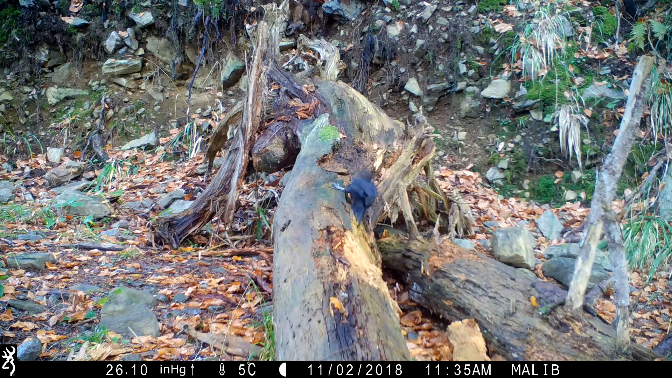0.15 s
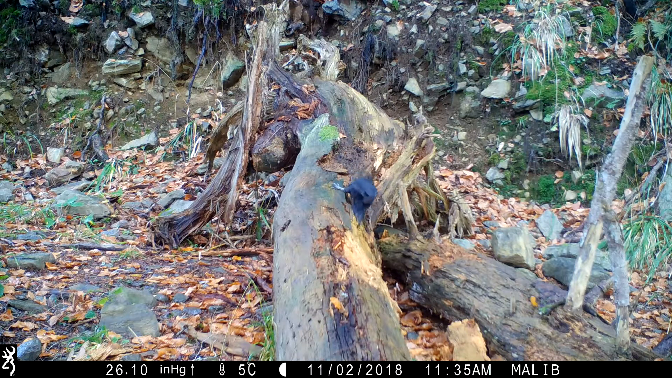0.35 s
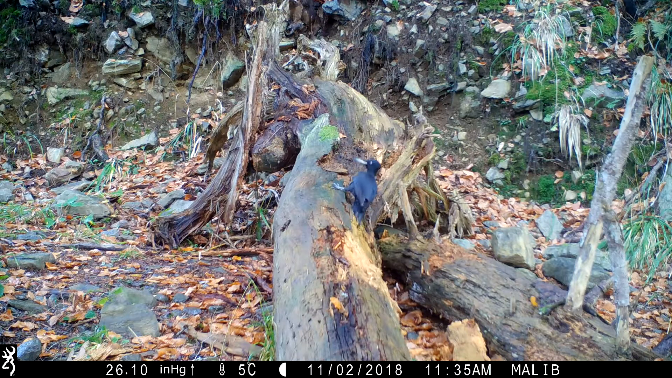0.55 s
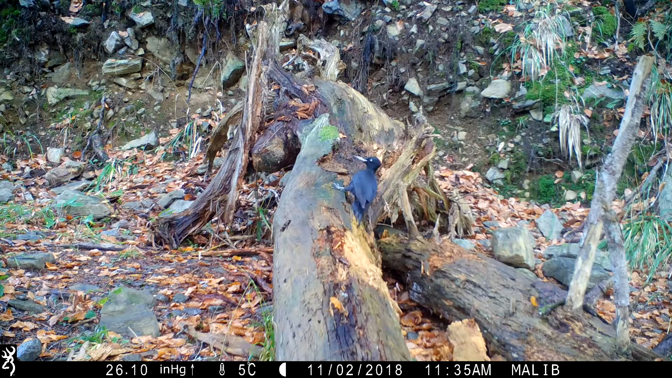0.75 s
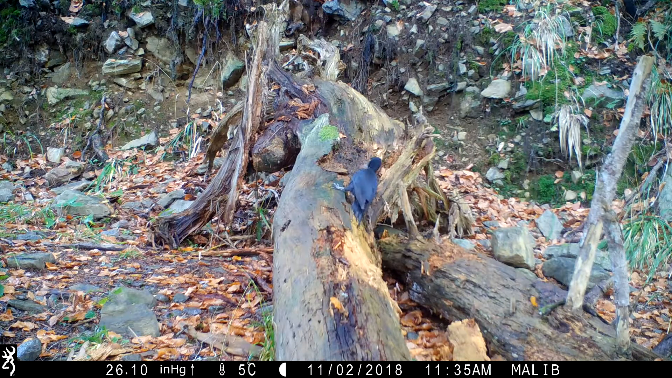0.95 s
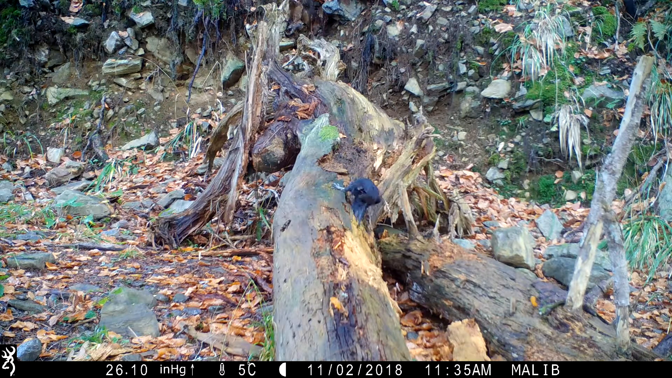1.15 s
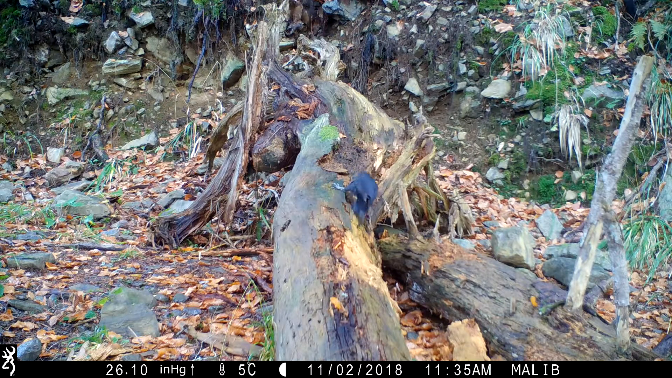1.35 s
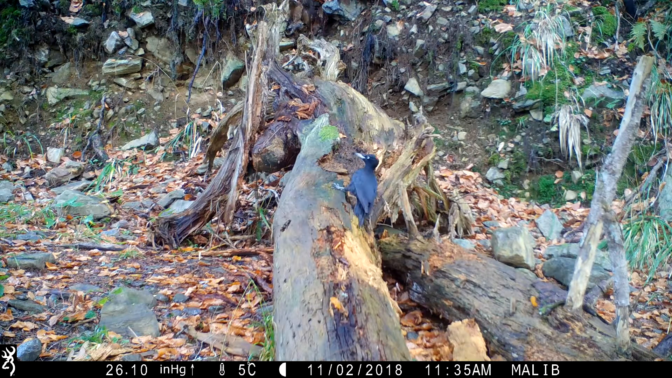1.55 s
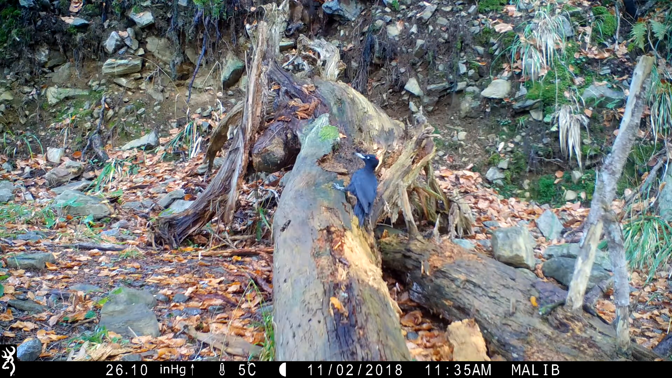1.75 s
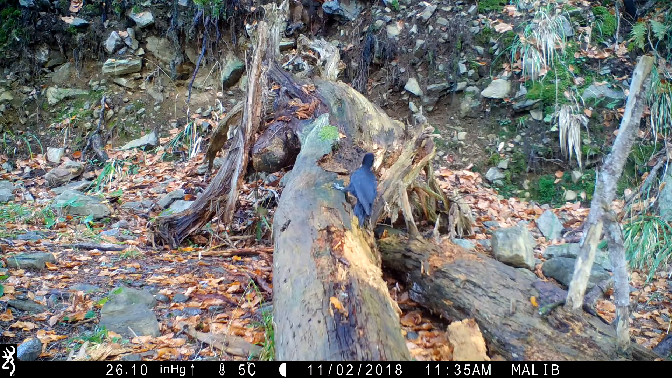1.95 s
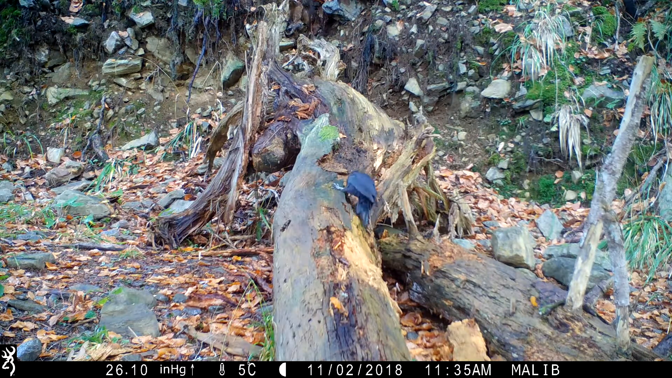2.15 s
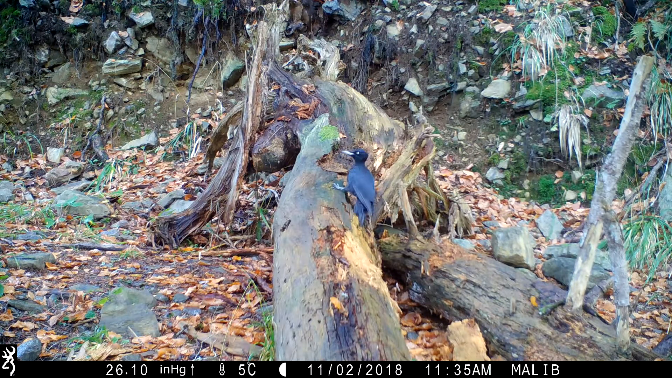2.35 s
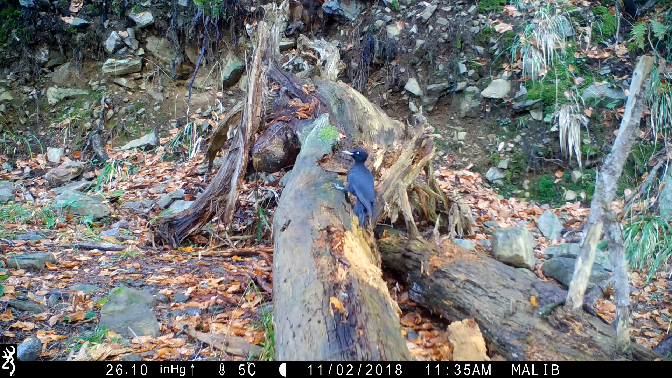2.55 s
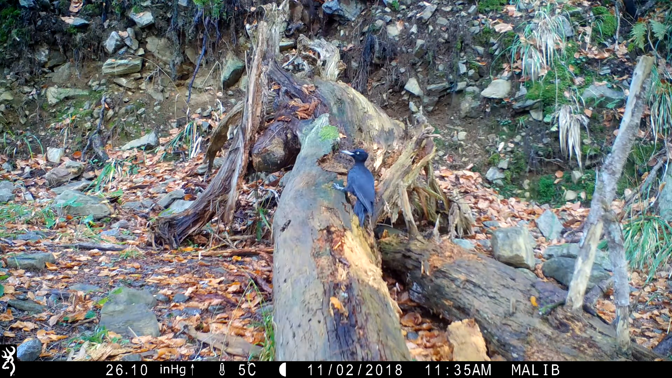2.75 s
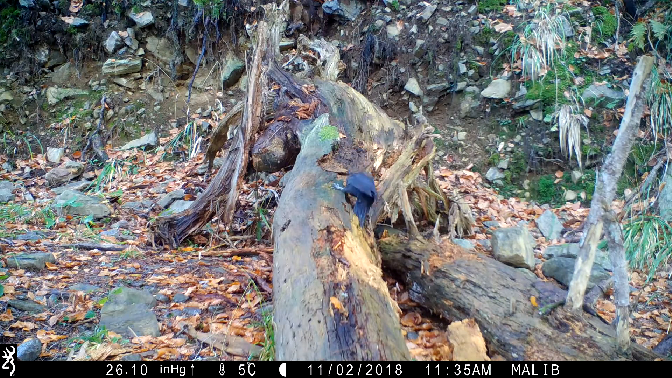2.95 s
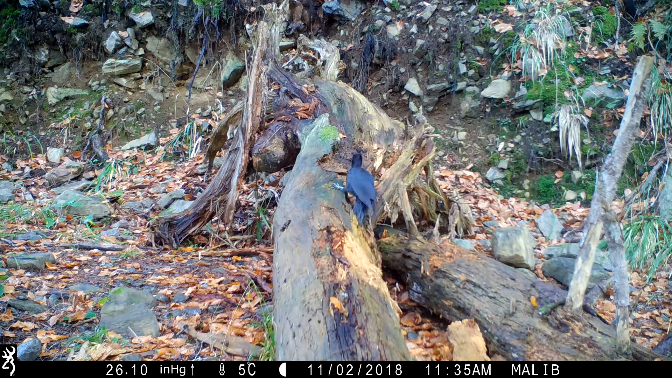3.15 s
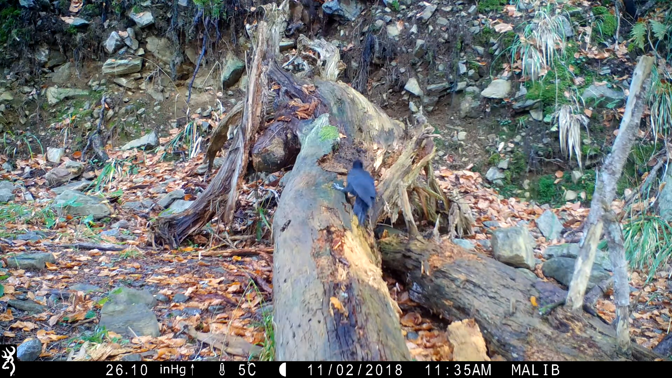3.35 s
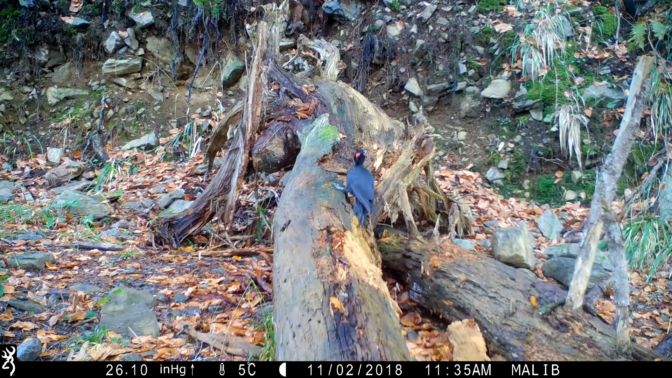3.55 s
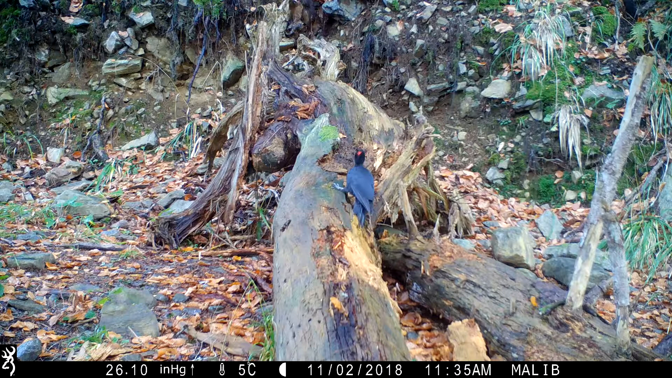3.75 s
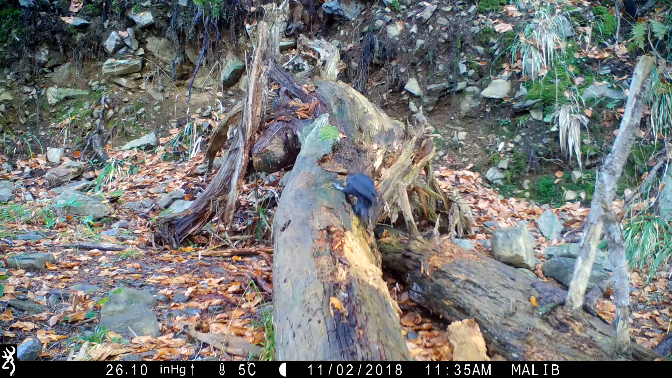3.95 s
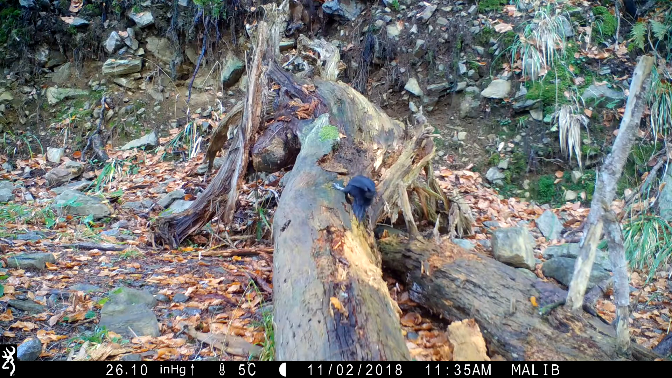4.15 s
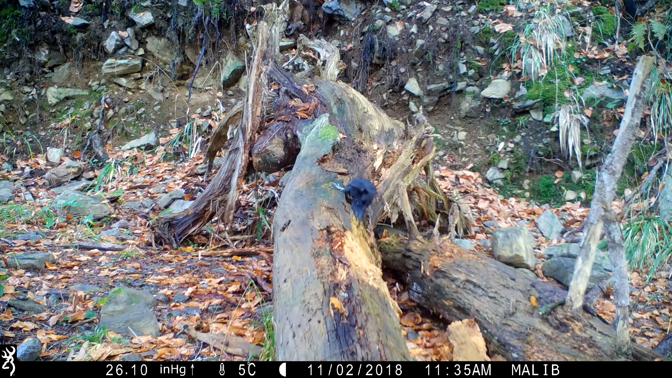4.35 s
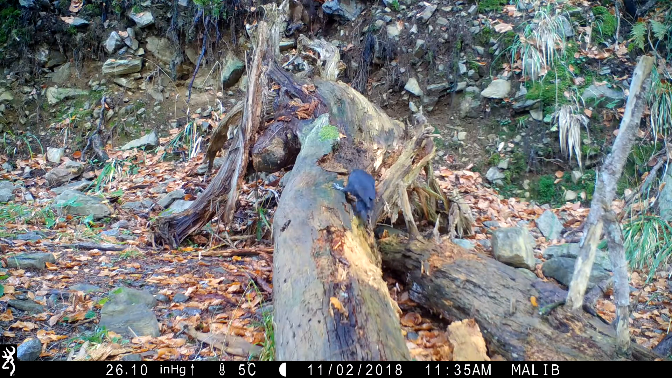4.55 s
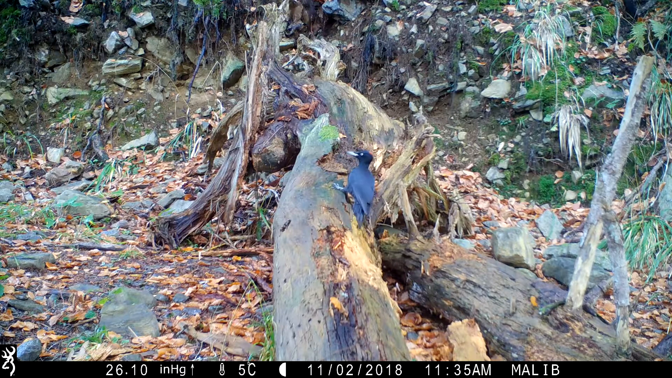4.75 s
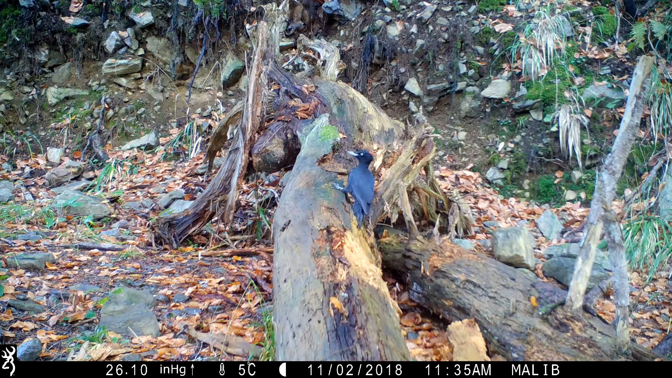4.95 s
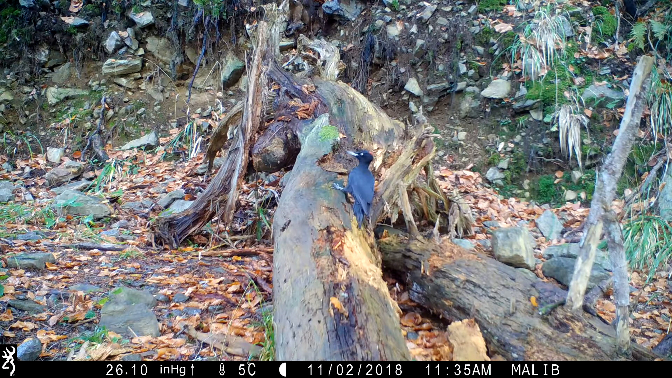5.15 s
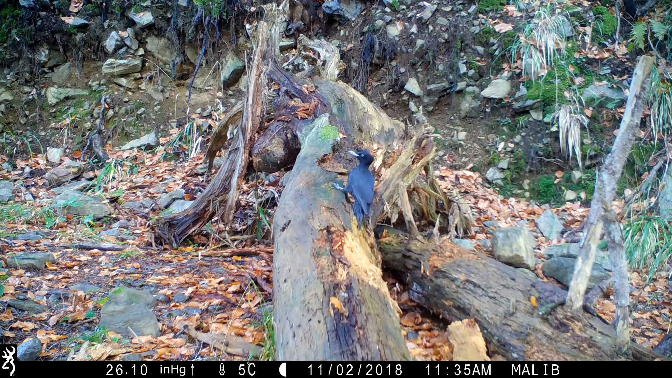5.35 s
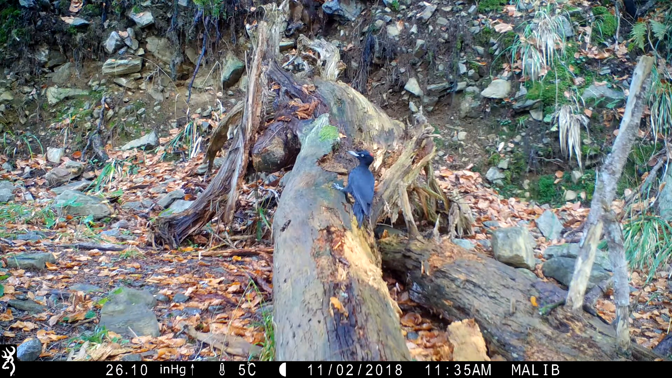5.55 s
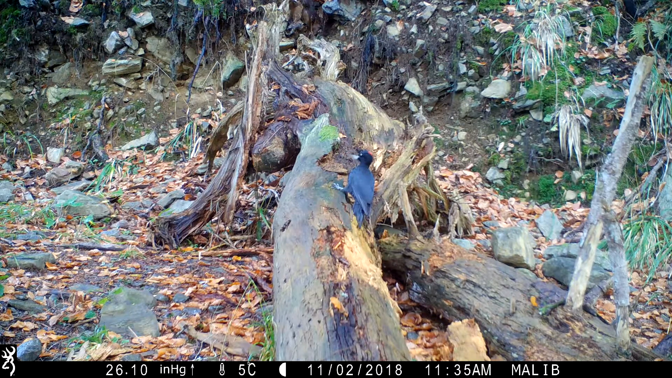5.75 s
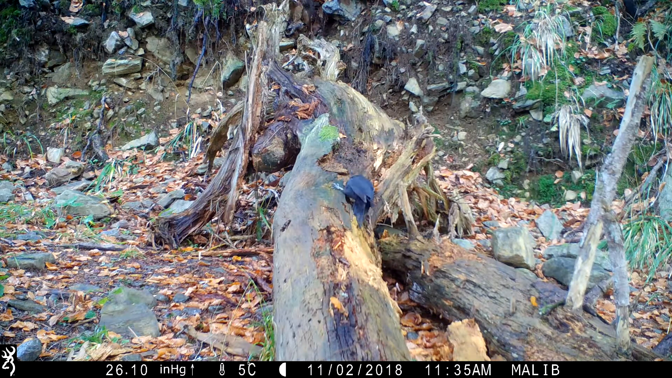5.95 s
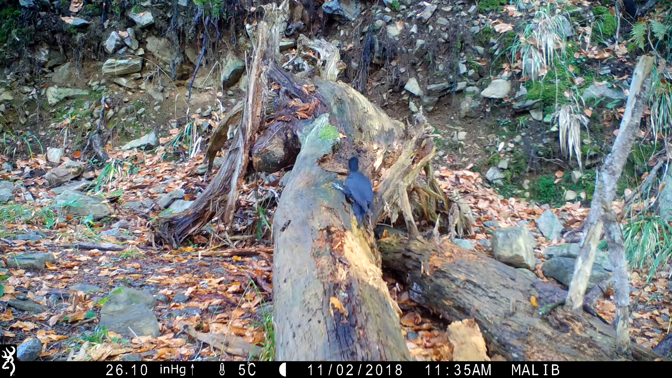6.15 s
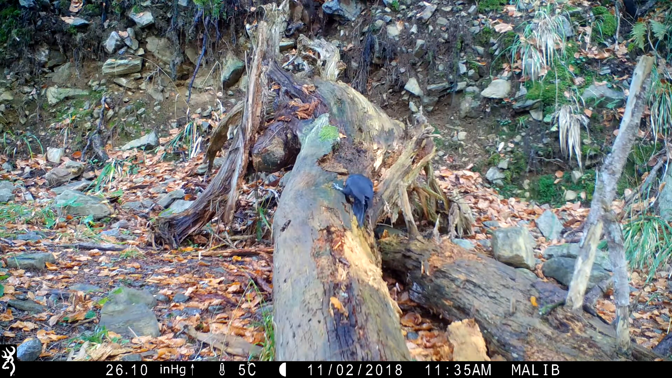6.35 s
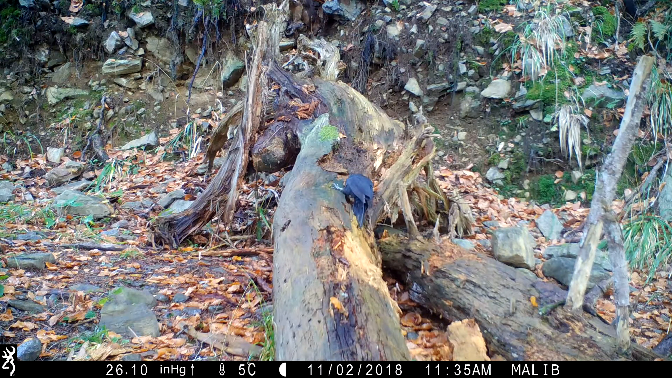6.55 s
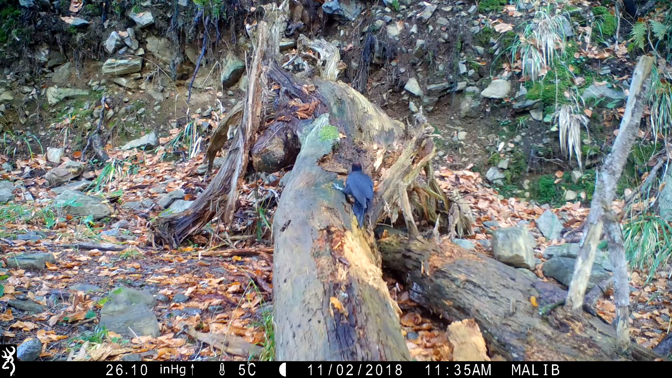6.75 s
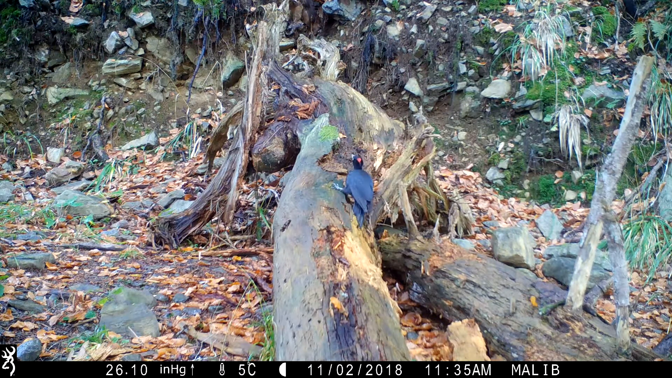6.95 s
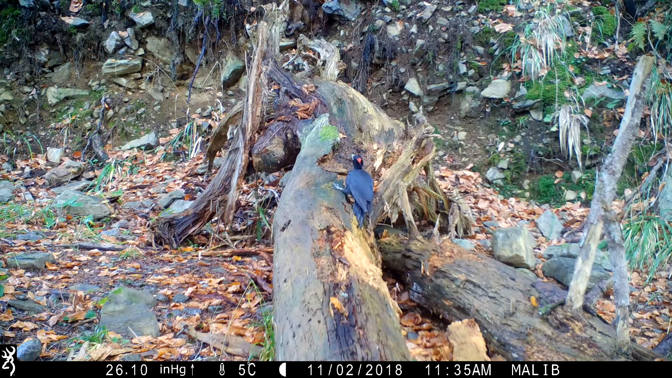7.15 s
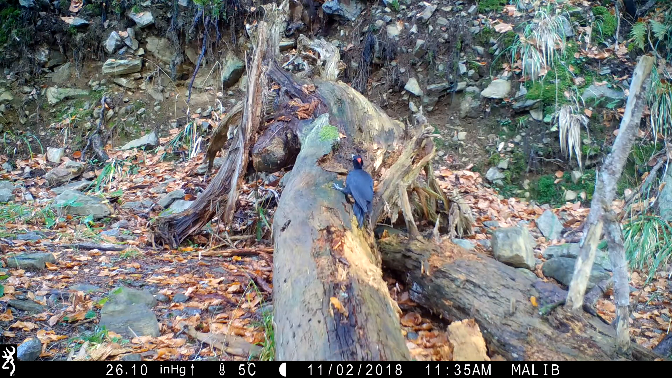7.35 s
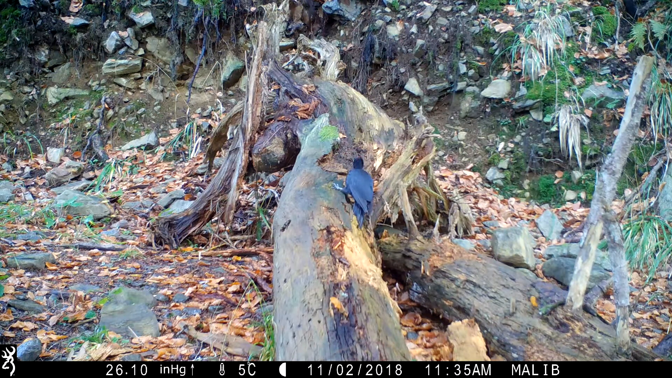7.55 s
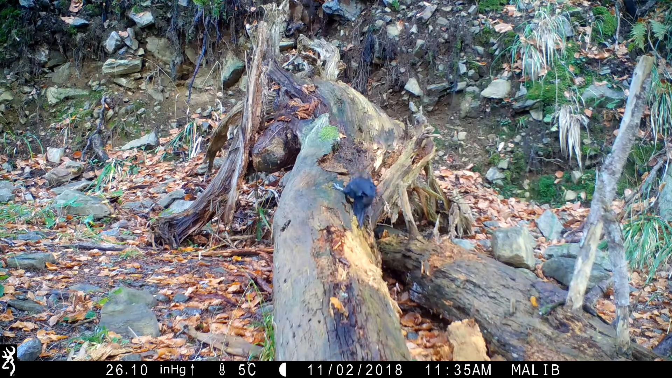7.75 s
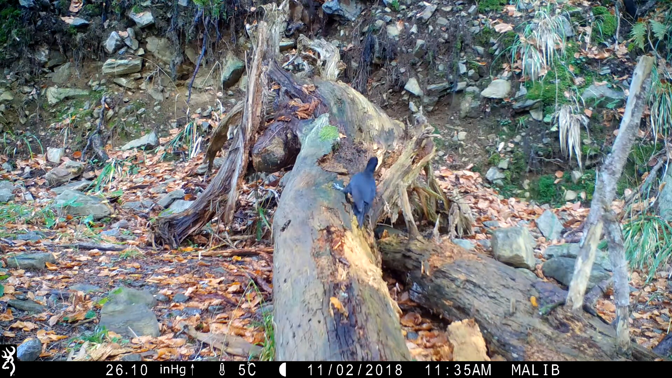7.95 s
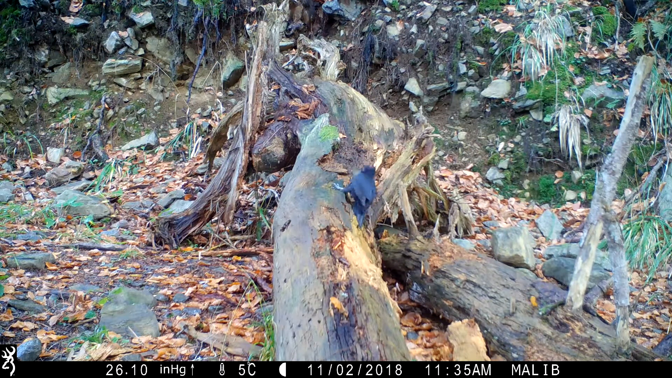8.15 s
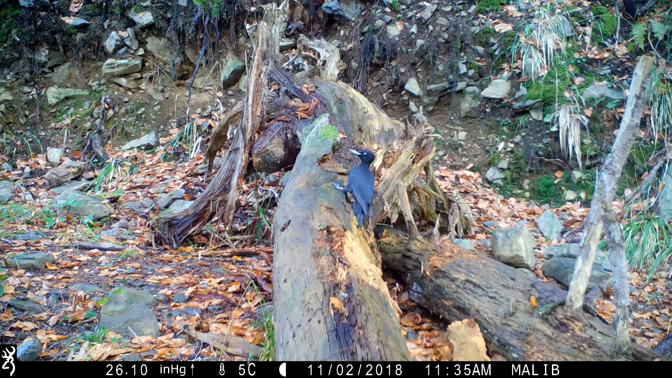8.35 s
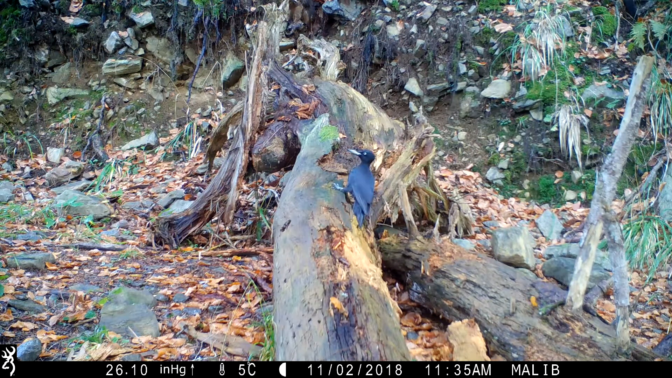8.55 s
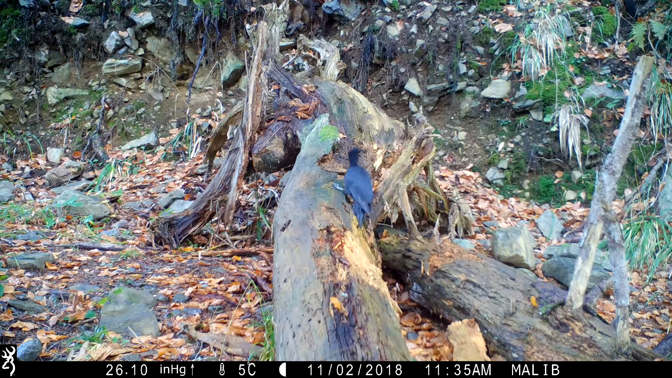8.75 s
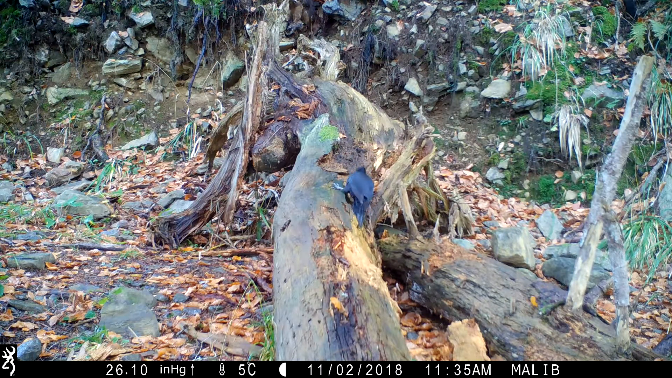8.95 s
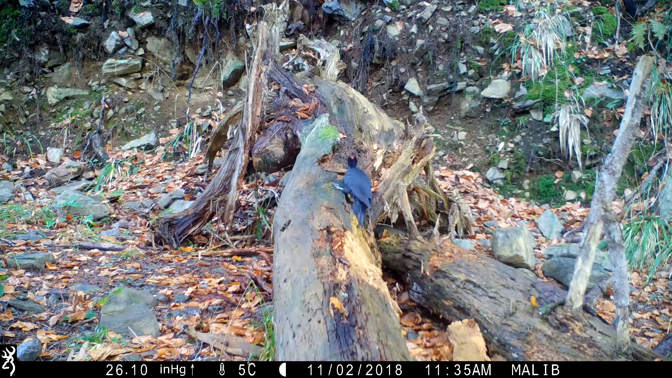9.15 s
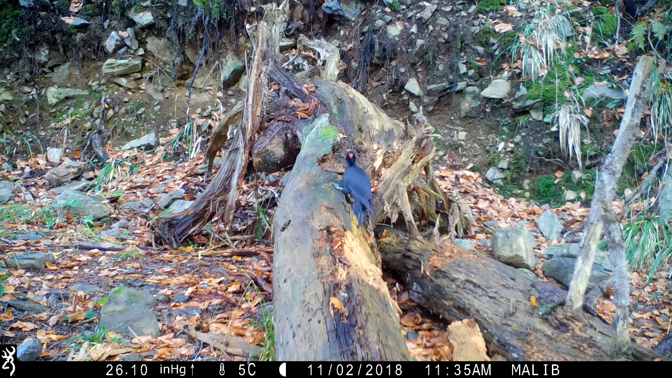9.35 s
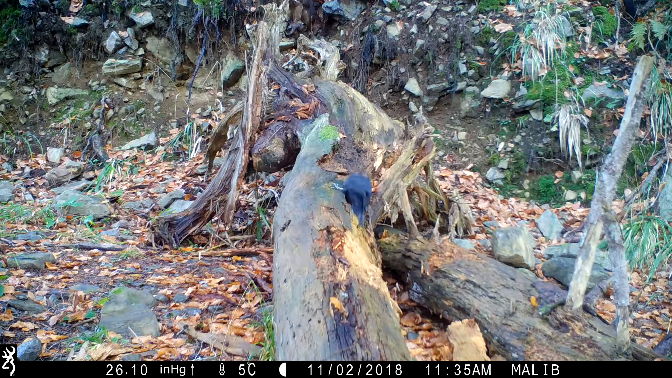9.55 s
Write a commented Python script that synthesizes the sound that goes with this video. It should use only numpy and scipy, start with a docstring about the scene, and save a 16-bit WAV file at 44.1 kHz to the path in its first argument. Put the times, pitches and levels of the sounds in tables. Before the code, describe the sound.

A woodpecker chisels at a rotten log in a forest, a few metres from a small, dull microphone. About a dozen sharp pecks land at uneven intervals, singly or in pairs, each with a crack of damp wood and a short hollow thud. Light taps and faint splinter ticks fall in between, and a steady hiss runs underneath.

```python
"""Woodpecker on a rotten log

A woodpecker chisels at a log in a forest, a few metres from a trail camera. Each peck is a graze,
then a blow that rings and cracks the damp wood and thuds the trunk; light taps and splinters tick
in between. The camera's dull little microphone adds a steady hiss and a very faint whine."""
import sys
import numpy as np
from scipy import signal
from scipy.fft import rfft, irfft
from scipy.io import wavfile

SR = 44100
rng = np.random.default_rng(int(sys.argv[2]) if len(sys.argv) > 2 else 0)


def log_audio(samples):
    """Write samples as a 16-bit WAV file to the path given in sys.argv[1]."""
    # one column per channel
    frames = np.atleast_2d(samples).T
    # limit to full scale, then quantise
    limited = np.clip(frames, -1, 1)
    pcm = np.round(limited * 32767).astype(np.int16)
    wavfile.write(sys.argv[1], SR, pcm)


N = 422919

# Full pecks; every spot on the log has its own two notes. Each row: start in seconds, main note in Hz,
# its level in dB, second note in Hz, its level in dB, crack in dB, thud in dB,
# the graze's lead on the blow in seconds, graze in dB.
FULL_PECKS = [ (0.219, 1210, -20, 690, -30, -30.5, -48, 0.00524, -30),
              (1.137, 1560, -29, 1850, -37, -36, -44.5, .0045, -31),
              (2.0977, 1400, -39, 2080, -33, -34, -35, 0.0073, -29),
              (3.007, 1700, -31, 2760, -43, -37, -35.5, .002, -42),
              (3.266, 1520, -32, 1180, -31, -29.5, -31.5, .0018, -28),
              (3.925, 1150, -30, 1720, -32.5, -31.5, -32.5, .002, -31),
              (4.1872, 1690, -19, 2600, -25.5, -29.5, -37.5, .0016, -32),
              (5.9692, 1150, -23.5, 1880, -26.5, -35, -28, 0.0024, -37),
              (6.2491, 1614, -14, 1400, -33, -30, -33, 0.00103, -41),
              (7.7797, 1430, -26, 1180, -40, -27, -41, .0026, -35),
              (8.0672, 1590, -29.5, 2920, -31.5, -29, -44, .002, -36),
              (8.8748, 1620, -26.5, 1130, -27.5, -29, -33.5, 0.0019, -25.5)]
# Tone of fibres crushed under the beak. Each row: frequency in Hz, relative level in dB.
CRACK_SPECTRUM = [(150, -23), (700, -6.5), (1200, 6), (3050, 0.5), (3750, -15.5), (5000, -25.5),
                  (7000, -51.5), (12000, -67)]


def pecks(damp_t60_s=0.014, graze_pitch_ratio=0.92):
    """The bill grazes the wood, then drives in: a small, damp patch rings and its fibres crack."""
    out = np.zeros(N)
    for start, main_hz, main_db, second_hz, second_db, crack_db, _, lead_s, graze_db in FULL_PECKS:
        # the soft graze rings a little lower and longer than the blow
        graze = wood_ring(main_hz * graze_pitch_ratio, t60=0.018, rise_s=0.00038)
        add(out, start - lead_s, amp(graze_db) * graze)
        add(out, start, amp(main_db) * wood_ring(main_hz, damp_t60_s, rise_s=0.0004))
        add(out, start, amp(second_db) * wood_ring(second_hz, damp_t60_s, rise_s=0.0007))
        add(out, start, amp(crack_db) * fracture(CRACK_SPECTRUM, crumble=1.0, t60=0.054))
    return out


def log_thuds(mic_low_cut_hz=195):
    """The rotten trunk answers each deep blow with a short, hollow thud."""
    # The trunk's modes. Each row: pitch in Hz, relative level in dB, time to fall 60 dB in seconds.
    trunk_modes = [(258, 1, 0.047), (298, 1, 0.036), (383, 10, 0.019), (625, -16, 0.028)]
    thud = sum(amp(db) * wood_ring(hz, t60, rise_s=0.0006) for hz, db, t60 in trunk_modes)
    # the microphone's steep low cut thins the thud's deepest bass
    thud = signal.sosfilt(signal.cheby1(4, 1, mic_low_cut_hz, "high", fs=SR, output="sos"), thud)
    thud /= abs(thud).max()
    out = np.zeros(N)
    for start, *_, thud_db, _, _ in FULL_PECKS:
        add(out, start, amp(thud_db) * thud)
    return out


def light_taps(crack_db=-38.5):
    """The bill tip touches once, alone or rebounding from a peck: a tiny ring and a crack."""
    # Each row: start in seconds, ring level in dB, pitch in Hz, time to fall 60 dB in seconds.
    taps = [(.3352, -34, 2140, .008), (0.8478, -18.5, 1680, 0.0028), (1.963, -32, 1250, 0.013),
            (5.6207, -29, 1480, .0034), (8.076, -33, 2460, .008), (8.5546, -28.5, 2500, .011),
            (8.8866, -25, 2400, .008)]
    out = np.zeros(N)
    for start, db, hz, t60 in taps:
        add(out, start, amp(db) * wood_ring(hz, t60, rise_s=0.00033))
        add(out, start, amp(crack_db) * fracture(CRACK_SPECTRUM, crumble=0.82, t60=0.056))
    return out


def splinters(crumbs_per_s=1.5, crumb_db=-45, crumb_spread_db=2):
    """Chips tick and crunch as they are pried off; crumbs of bark give way under the bird at random."""
    # Torn chips. Each row: start in seconds, level in dB, time to fall 60 dB in seconds,
    # treble tilt in dB per octave.
    chips = [(.3352, -38, .02, 0), (.4043, -30, .008, -7), (2.178, -38, .015, -3),
             (2.3566, -37.5, 0.029, 0), (2.52, -42, .04, 0), (4.823, -37, .018, 0),
             (6.664, -30.5, .015, -17), (7.1732, -39, .018, -3), (7.2613, -34.5, 0.016, -4),
             (7.795, -30, 0.041, -11), (8.2063, -34, 0.0092, -4), (8.4914, -34.5, 0.034, -7),
             (8.5552, -33.5, 0.019, 2)]
    # Tone of a snapping splinter. Each row: frequency in Hz, relative level in dB.
    snap_spectrum = [(300, -18.5), (1400, 4.5), (3100, 11.5), (4200, 1), (6000, -16), (7500, -40),
                     (12000, -47)]
    out = np.zeros(N)
    for start, db, t60, tilt_db in chips:
        add(out, start, amp(db) * fracture(snap_spectrum, crumble=0.86, t60=t60, tilt_db=tilt_db))
    for when, size in rng.random((round(crumbs_per_s * N / SR), 2)):
        db = crumb_db + crumb_spread_db * (2 * size - 1)
        add(out, when * N / SR, amp(db) * fracture(snap_spectrum, crumble=0.83, t60=0.016))
    return out


def wood_ring(hz, t60, rise_s):
    """One damped mode, its attack rounded because soft wood takes a moment to give."""
    t = np.arange(6000) / SR
    envelope = (1 - np.exp(-(t / rise_s) ** 2)) * amp(-60 * t / t60)
    return envelope / envelope.max() * np.sin(2 * np.pi * hz * t)


def fracture(spectrum, crumble, t60, tilt_db=0, fibres_per_s=4000, size=2048):
    """One fibre snaps and smaller ones give way after it; crumble sets how loud they are."""
    hz = abs(np.fft.fftfreq(size, 1 / SR))
    log_gain = np.log(amp(curve_at(spectrum, hz) + tilt_db * np.log2(1 + hz / 1000)))
    # minimum phase keeps the click's attack sharp
    click = np.fft.ifft(np.exp(np.conj(signal.hilbert(log_gain)))).real
    fibres = (2 * rng.random(size) - 1) * (rng.random(size) < fibres_per_s / SR)
    fibres *= crumble * amp(-60 * np.arange(size) / SR / t60)
    fibres[0] = 1  # the first snap
    return signal.fftconvolve(fibres, click / abs(click).max())


def forest_echo(sound, echoes_per_s=2000, predelay_s=0.003, size=22050):
    """Scatter from the ground, the bank and trunks, each band dying at its own speed."""
    # The echo's decay. Each row: frequency in Hz, time to fall 60 dB in seconds.
    decay_times = [(150, 0.26), (1500, 0.19), (6000, 0.3)]
    echoes = rng.choice([-1., 1.], size) * (rng.random(size) < echoes_per_s / SR)
    echoes *= np.arange(size) > predelay_s * SR
    hz, t, bands = signal.stft(echoes, SR, nperseg=256)
    decay = amp(-60 * t / curve_at(decay_times, hz)[:, None])
    tail = signal.istft(bands * decay, SR, nperseg=256)[1]
    return signal.fftconvolve(sound, tail / np.linalg.norm(tail))[:N]


def microphone_hiss(hiss_db=-45.5, floor_db=-84.5):
    """Even mid-range hiss over a far weaker white electronic floor."""
    # Tone of the hiss. Each row: frequency in Hz, relative level in dB.
    hiss_spectrum = [(25, -32), (100, -22.5), (160, -19), (250, -12), (500, -6.5), (1000, -1.27),
                     (1280, -1.5), (1560, -0.44), (1900, -3), (2750, -7.5), (3500, -17.5), (5000, -34),
                     (6500, -49.5), (9000, -73)]
    colour = amp(curve_at(hiss_spectrum, np.fft.rfftfreq(N, 1 / SR)))
    hiss = irfft(rfft(rng.standard_normal(N)) * colour, N)
    return amp(hiss_db) * unit_rms(hiss) + amp(floor_db) * rng.standard_normal(N)


def camera_whine(pitch_hz=7796, flip_cycle_hz=29.7, level_db=-89):
    """A thin electronic tone whose sign flips 59.4 times a second, once per camera frame, with a trace of its
    octave."""
    t = np.arange(N) / SR
    phase = 2 * np.pi * pitch_hz * t
    flips = np.sign(np.sin(2 * np.pi * flip_cycle_hz * t))
    return amp(level_db) * unit_rms(flips * np.sin(phase) + amp(-17) * np.sin(2 * phase))


def amp(db):
    """Decibels to gain."""
    return 10 ** (np.asarray(db) / 20)


def unit_rms(x):
    """Scales to an rms of 1."""
    return x / np.sqrt(np.mean(x ** 2) + 1e-20)


def curve_at(points, hz):
    """Reads a table on a log-frequency axis."""
    point_hz, values = np.transpose(points)
    return np.interp(np.log(hz + 1), np.log(point_hz + 1), values)


def add(mix, start_s, sound):
    """Mixes a sound in at its start time."""
    part = mix[round(start_s * SR):][:len(sound)]
    part += sound[:len(part)]


def scene(mic_low_cut_hz=220, echo_db=-16):
    """The bird at work, its faint echo and the steady background, in mono."""
    # the camera's microphone cuts the bass of the pecks, taps and splinters
    low_cut = signal.butter(2, mic_low_cut_hz, "high", fs=SR, output="sos")
    bird = signal.sosfilt(low_cut, pecks() + light_taps() + splinters()) + log_thuds()
    return (bird + amp(echo_db) * forest_echo(bird) + microphone_hiss() + camera_whine())[None]


def record(dry):
    """The camera's band limit cuts the highest treble."""
    high_cut = signal.firwin(511, 15750, window=("kaiser", 9), fs=SR)
    return signal.oaconvolve(dry, high_cut[None], "same")


dry = scene()
out = record(dry)
log_audio(out)
```